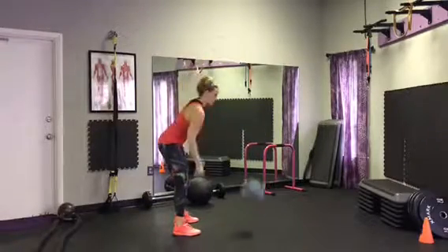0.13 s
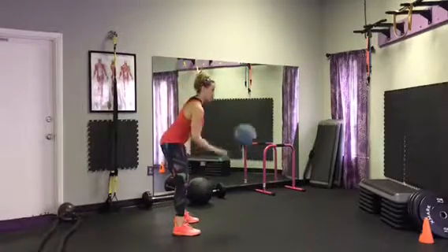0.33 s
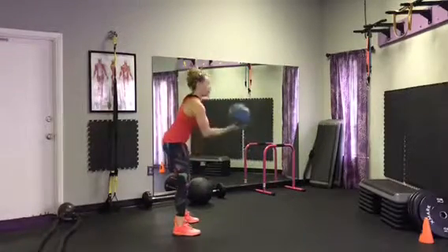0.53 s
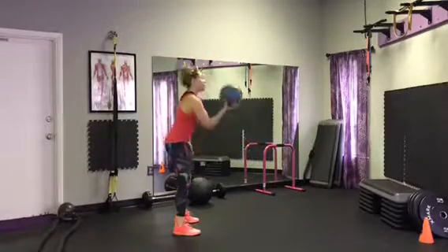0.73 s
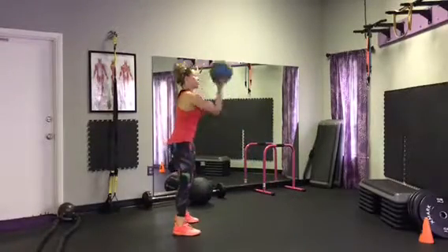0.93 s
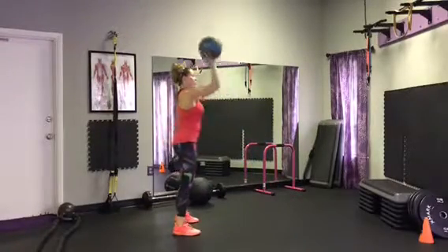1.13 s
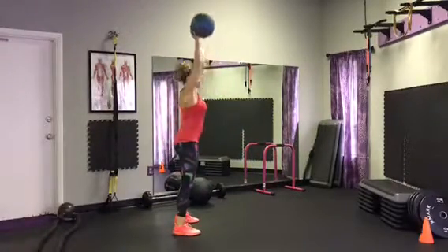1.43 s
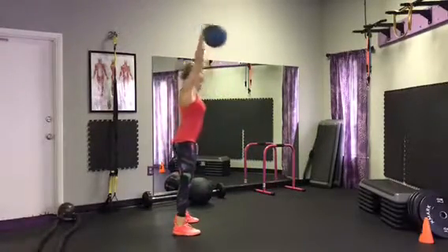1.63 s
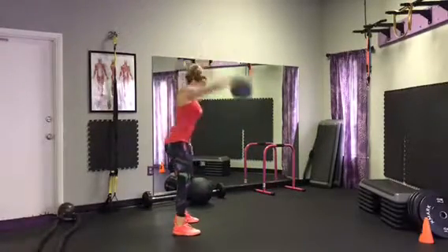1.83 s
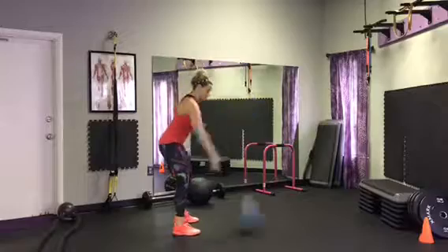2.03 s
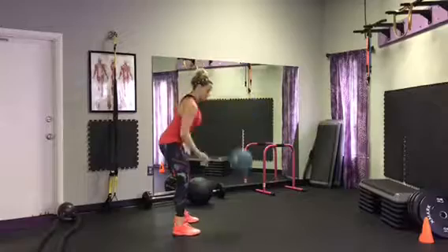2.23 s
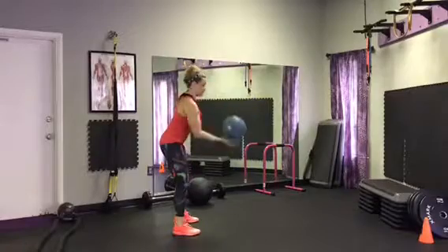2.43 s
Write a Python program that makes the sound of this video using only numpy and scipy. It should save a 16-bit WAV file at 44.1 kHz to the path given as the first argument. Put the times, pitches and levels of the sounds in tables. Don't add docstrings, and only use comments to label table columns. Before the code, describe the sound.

Heavy exercise ball thuds hard on a gym floor, rings in the room, then palms catch it.

```python
import sys
import numpy as np
from scipy import signal
from scipy.fft import rfft, irfft, next_fast_len
from scipy.io import wavfile
from scipy.ndimage import uniform_filter1d

SR = 44100
rng = np.random.default_rng(int(sys.argv[2]) if len(sys.argv) > 2 else 0)


def volts_from_db(level):
    exponent = np.asarray(level, float) / 20
    return 10 ** exponent


def put_to_file(sound):
    columns = np.atleast_2d(sound).T
    safe = np.clip(columns, -1, 1)
    whole_steps = np.round(safe * 32767)
    wavfile.write(sys.argv[1], SR, whole_steps.astype(np.int16))


N = 114660


def unit(x):
    return x / np.sqrt(np.mean(x ** 2) + 1e-20)


def along(points, hz):
    f, value = np.transpose(points)
    return np.interp(np.log(hz + 1), np.log(f + 1), value)


def filtered(x, response):
    m = next_fast_len(len(x) + SR // 2)
    return irfft(rfft(x, m) * response(np.fft.rfftfreq(m, 1 / SR)), m)[:len(x)]


def shaped_noise(length, response):
    return unit(filtered(rng.standard_normal(length), response))


def resonance(f, hz, width):
    return 1j * f * width / (hz * hz - f * f + 1j * f * width)


def phase_drift(length, rough_hz):
    return np.cumsum(rng.standard_normal(length)) * np.sqrt(2 * np.pi * rough_hz / SR)


def add(track, start_s, sound):
    part = track[round(start_s * SR):][:len(sound)]
    part += sound[:len(part)]


def tail(tone):
    # pitch_hz, t60_s
    room_decay = [(60, .7), (170, .62), (350, .72), (900, .66), (2400, .64), (6000, .64), (10000, .42),
                  (15000, .28)]
    far_db, far_t60_s = -22, 1.5
    rise_s = 0.0079
    hz, t, z = signal.stft(rng.standard_normal(SR), SR, nperseg=256)
    near = volts_from_db(-60 * t / along(room_decay, hz)[:, None])
    far = volts_from_db(far_db - 60 * t / far_t60_s)
    z = z * np.hypot(near, far) * volts_from_db(along(tone, hz))[:, None]
    x = signal.istft(z, SR, nperseg=256)[1][:SR]
    x = x * (1 - np.exp(-(np.arange(SR) / SR / rise_s) ** 2))
    return x / np.linalg.norm(x)


def in_room(sound, diffuse, room_db):
    # delay_s, level_db
    walls = [(.0035, -20.5), (.0065, -8.5), (.0092, -7.5), (.0116, -18.5), (.0162, -11.5), (.021, -19)]
    answer = volts_from_db(room_db) * diffuse
    answer[0] += 1
    for delay_s, level_db in walls:
        answer[round(delay_s * SR)] += volts_from_db(level_db + rng.normal(0, 1))
    return signal.fftconvolve(sound, answer)


def crack_and_thud():
    u = np.arange(SR // 20) / SR
    crack_s = .00006
    crack = -(1 - u / crack_s) * np.exp(-u / crack_s)
    high_hz, low_hz, fall_s, t60_s = 1380, 250, .001, 0.023
    turns = low_hz * u + (high_hz - low_hz) * fall_s * (1 - np.exp(-u / fall_s))
    thud = np.sin(2 * np.pi * turns) * volts_from_db(-60 * u / t60_s)
    return volts_from_db(3) * crack + volts_from_db(-1) * thud


def skin_fizz():
    u = np.arange(SR // 20) / SR
    level_db, t60_s = -22.5, 0.011
    return volts_from_db(level_db - 60 * u / t60_s) * rng.standard_normal(len(u))


def ball_and_floor_ring(modes, phases):
    t = np.arange(SR) / SR
    ring = np.zeros(SR)
    for (pitch_hz, level_db, t60_s), phase in zip(modes, phases):
        envelope = volts_from_db(level_db + rng.normal(0, 1) - 60 * t / t60_s)
        ring += envelope * np.sin(2 * np.pi * pitch_hz * t + phase + phase_drift(SR, rough_hz=3))
    rise_s = .005
    return volts_from_db(-17.5) * ring * (1 - np.exp(-t / rise_s))


def room_boom():
    # pitch_hz, level_db, t60_s, rise_s
    modes = [(58.9, -12.5, .35, 0.049), (50, -15.5, 0.35, .03), (67.5, -17, .7, .03),
             (78.2, -21.5, .6, 0.06), (94.2, -22, 0.68, 0.0083), (128, -19, .15, 0.0033)]
    gather_s = .04
    t = np.arange(SR) / SR
    boom = np.zeros(SR)
    for pitch_hz, level_db, t60_s, rise_s in modes:
        swell = volts_from_db(level_db - 60 * t / t60_s) * (1 - np.exp(-t / rise_s))
        boom += swell * np.cos(2 * np.pi * pitch_hz * (t - gather_s))
    return boom


def slab_shiver(length_s):
    t = np.arange(round(length_s * SR)) / SR
    shiver = shaped_noise(len(t), lambda f: resonance(f, 650, 900) ** 3)
    return volts_from_db(-27) * shiver * np.sin(np.pi * (t / t[-1]) ** 2)


def slams():
    # start_s, level_db (peak)
    hits = [
        (.21855, -4),
        (2.19082, -3.5),
    ]
    # pitch_hz, level_db, t60_s
    ring_modes = [(165, -16, .5), (252, -13, .5), (303, -6, .5), (323, -9, .3), (371, -5, .45),
                  (434, -3, .3), (459, -1, .16), (523, -12, .4), (704, -11, .5), (780, -10, .35),
                  (894, -9, .37), (968, -11, .4), (1090, -13, .4), (1230, -15, .45)]
    # pitch_hz, level_db
    room_tone = [(60, -13.5), (200, -2), (400, -4), (650, -6.5), (1200, 0.5), (1700, -2.5), (4000, -3),
                 (16000, -3.5)]
    same_tail = 0.53
    slab_s = .008
    out = np.zeros(N)
    shared = tail(room_tone)
    phases = rng.uniform(0, 2 * np.pi, len(ring_modes))
    for start_s, level_db in hits:
        gain = volts_from_db(level_db)
        diffuse = np.sqrt(same_tail) * shared + np.sqrt(1 - same_tail) * tail(room_tone)
        add(out, start_s, gain * in_room(crack_and_thud(), diffuse, room_db=0))
        add(out, start_s, gain * skin_fizz())
        add(out, start_s, gain * (ball_and_floor_ring(ring_modes, phases) + room_boom()))
        add(out, start_s - slab_s, gain * slab_shiver(slab_s))
    return out


def catches():
    # start_s, level_db, length_s, hollow_hz, hollow_db
    slaps = [
        (0.6248, -33, 0.0069, 2035, 2),
        (.6342, -30.5, 0.0068, 2192, 0),
        (0.645, -39.5, 0.012, 1215, 3),
        (2.5894, -28, 0.00115, 11660, -7),
        (2.591, -36, 0.016, 624, -1),
    ]
    # pitch_hz, width_hz, level_db
    palm_modes = [(157, 80, 8.5), (505, 320, -6.5), (1140, 400, -3), (2100, 630, -0.5), (3420, 790, -6.5),
                  (4170, 680, -10), (5500, 1030, -9.5), (7940, 2300, -8.5), (12100, 6700, -9.5)]
    # pitch_hz, level_db
    hand_tone = [(100, -3.5), (600, -1), (1200, -0.5), (2100, -4.5), (3000, -2.5), (6000, -1.5),
                 (15000, -2)]

    def palm(f):
        return sum((-1) ** k * volts_from_db(level_db) * resonance(f, pitch_hz, width_hz)
                   for k, (pitch_hz, width_hz, level_db) in enumerate(palm_modes))

    out = np.zeros(N)
    t = np.arange(SR // 20) / SR
    for start_s, level_db, length_s, hollow_hz, hollow_db in slaps:
        noise = shaped_noise(len(t), palm)
        drift = phase_drift(len(t), rough_hz=220)
        pock = volts_from_db(hollow_db) * np.sin(2 * np.pi * hollow_hz * t + drift)
        age = t / length_s * 4
        slap = (noise + pock) * age * np.exp(1 - age)
        add(out, start_s, volts_from_db(level_db - 6) * in_room(slap, tail(hand_tone), room_db=1.5))
    return out


def releases():
    # start_s (centre), half_length_s, bright_share (skin against cloth)
    slides = [
        (.138, .028, .9),
        (2.103, .028, .85),
        (.196, .003, .1),
        (1.47, .12, .1),
        (.16, .06, 0),
        (2.16, .04, 0),
    ]
    slide_db = [-64, -63, -58, -72, -64.5, -70.5]
    # pitch_hz, level_db
    skin_tone = [(2000, -41.5), (5000, -7), (9000, -5), (12500, -1.5), (16000, -0.5)]
    # pitch_hz, level_db
    cloth_tone = [(250, -42), (600, 1.5), (1500, 0), (3000, -9), (6000, -12), (12000, -25.5)]
    t = np.arange(N) / SR
    skin = shaped_noise(N, lambda f: volts_from_db(along(skin_tone, f)))
    cloth = shaped_noise(N, lambda f: volts_from_db(along(cloth_tone, f)))
    out = np.zeros(N)
    for (start_s, half_s, bright), level_db in zip(slides, slide_db):
        stroke = np.exp(-((t - start_s) / half_s) ** 2)
        out += volts_from_db(level_db) * stroke * (bright * skin + (1 - bright) * cloth)
    return out


def ventilation():
    # pitch_hz, level_db (per Hz)
    air_tone = [(25, -22.5), (58, -2.5), (150, -14), (240, -19), (400, -25.5), (2000, -35.5),
                (10000, -46.5), (12000, -42.5), (15500, -52.5)]
    # pitch_hz, width_hz, level_db
    fan_hums = [(51, 7.8, -58.5), (74, 5.2, -69.5), (130, 1.9, -74.5), (238, 16, -75), (290.5, 8, -78),
                (339, 19, -77.5)]
    out = volts_from_db(-60) * shaped_noise(N, lambda f: volts_from_db(along(air_tone, f)) * (f > 20))
    for pitch_hz, width_hz, level_db in fan_hums:
        out += volts_from_db(level_db) * shaped_noise(N, lambda f: resonance(f, pitch_hz, width_hz) ** 2)
    return out


def scene():
    return (slams() + catches() + releases() + ventilation())[None]


def roll_off(x):
    return signal.sosfilt(signal.butter(12, 17080, fs=SR, output="sos"), x)


def record(dry):
    # pitch_hz, level_db
    mic_tone = [(4200, 0), (5000, -2.5), (6000, 0), (9500, -1), (10600, -3), (11900, 0), (13000, -1)]
    # pitch_hz, level_db
    usual_top = [(15600, 0), (15800, -12), (16100, -70)]
    # pitch_hz, level_db
    attack_top = [(16700, 0), (17100, -70)]
    low_cut_hz, open_db, open_s = 40, -38, .003

    def microphone(f):
        low_cut = (1j * f / (low_cut_hz + 1j * f)) ** 1.1
        return low_cut * volts_from_db(along(attack_top, f) + along(mic_tone, f))

    full = filtered(dry[0], microphone)
    limited = filtered(full, lambda f: volts_from_db(along(usual_top, f)))
    highest = full - limited
    power = np.abs(uniform_filter1d(highest ** 2, round(open_s * SR)))
    is_open = power > volts_from_db(2 * open_db)
    gate = uniform_filter1d(1. * is_open, size=64)
    mix = (limited + gate * highest)[None]
    return roll_off(mix)


dry = scene()
out = record(dry)
put_to_file(out)
```